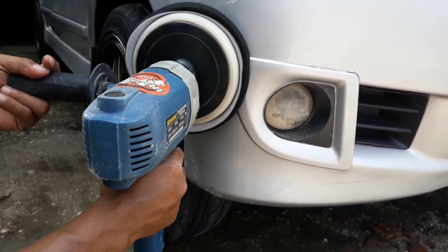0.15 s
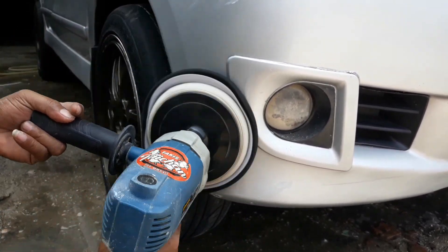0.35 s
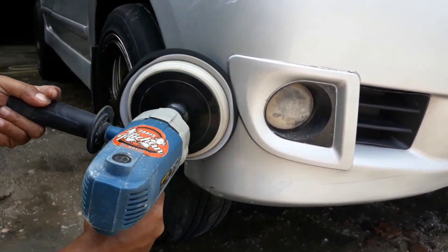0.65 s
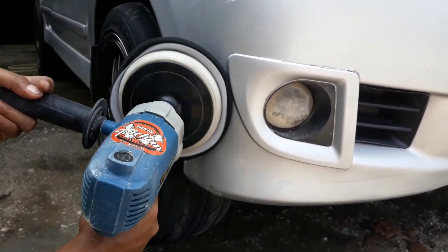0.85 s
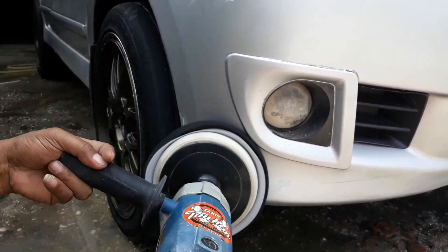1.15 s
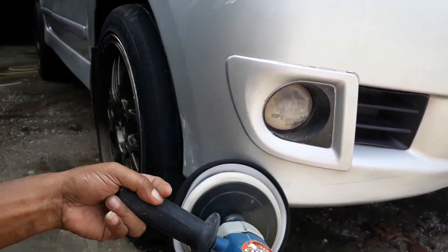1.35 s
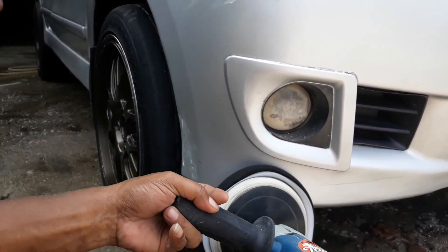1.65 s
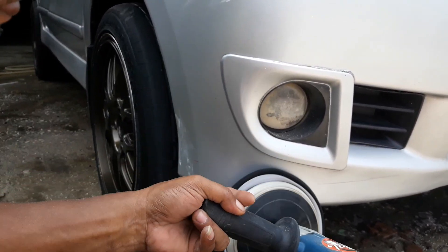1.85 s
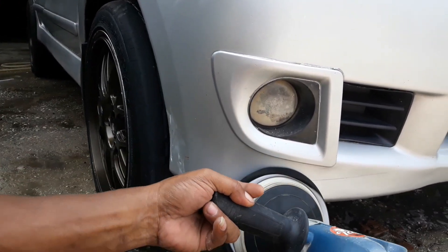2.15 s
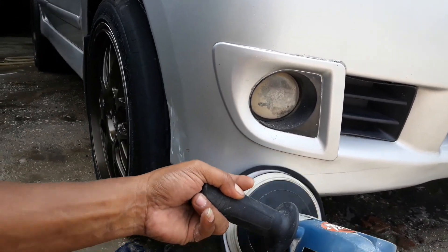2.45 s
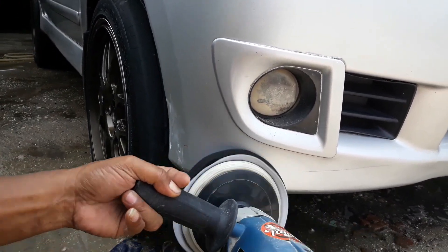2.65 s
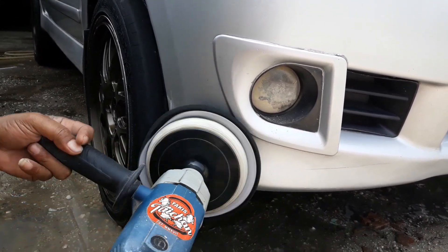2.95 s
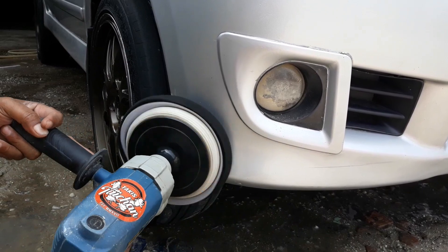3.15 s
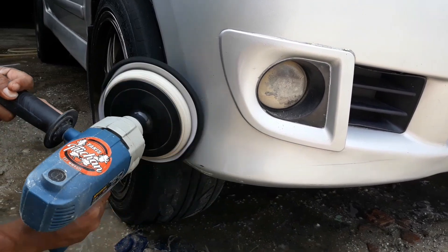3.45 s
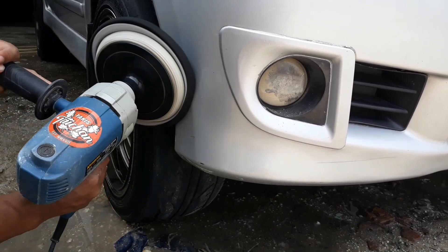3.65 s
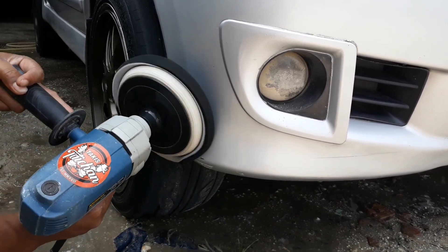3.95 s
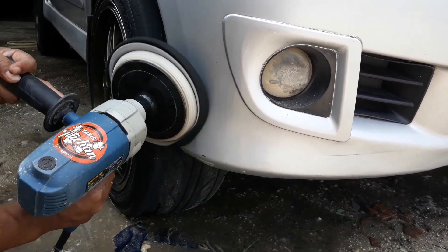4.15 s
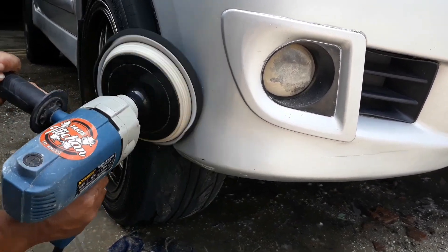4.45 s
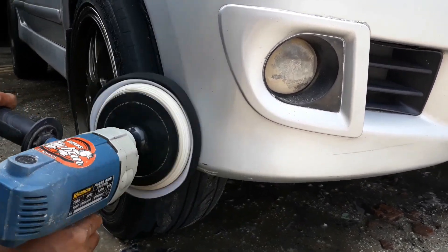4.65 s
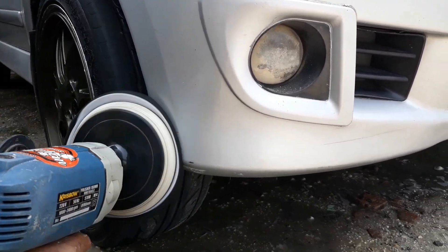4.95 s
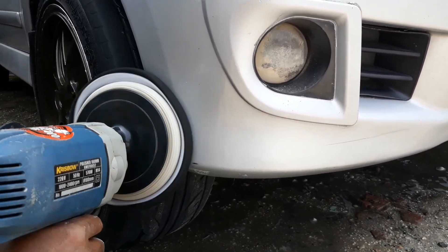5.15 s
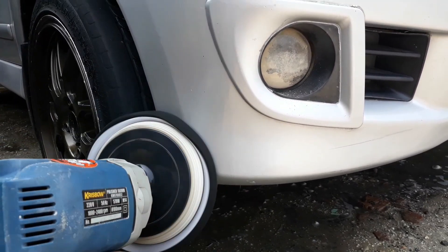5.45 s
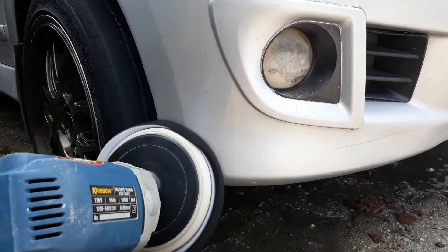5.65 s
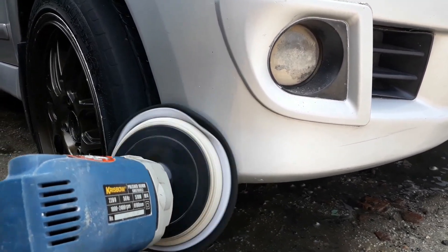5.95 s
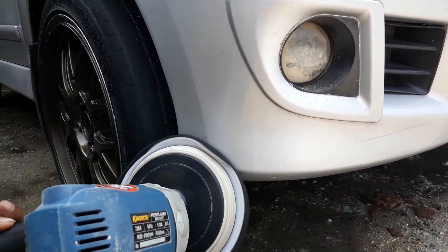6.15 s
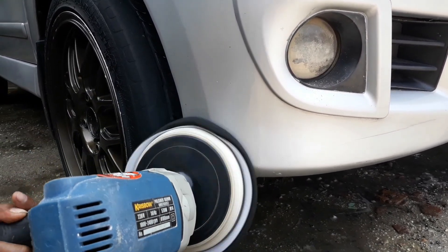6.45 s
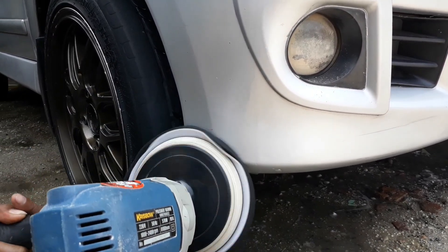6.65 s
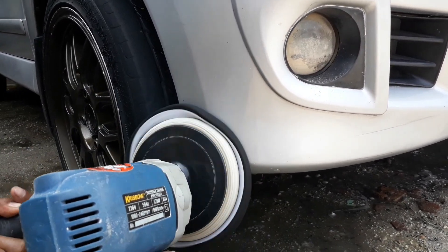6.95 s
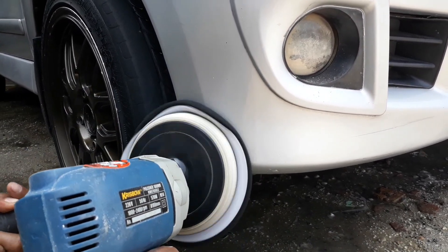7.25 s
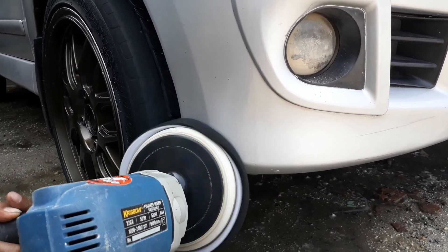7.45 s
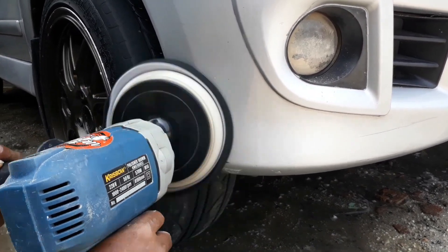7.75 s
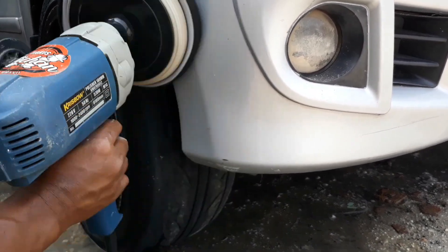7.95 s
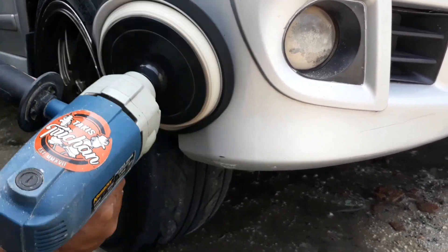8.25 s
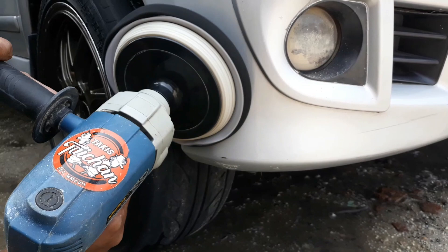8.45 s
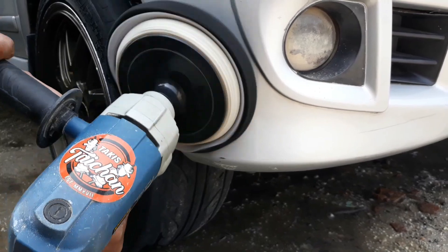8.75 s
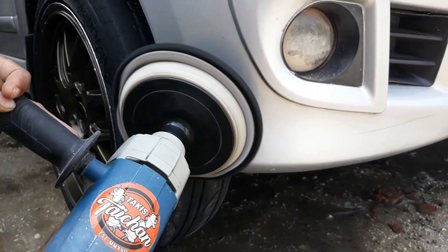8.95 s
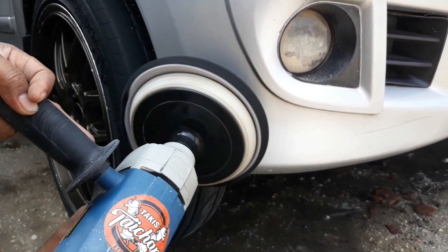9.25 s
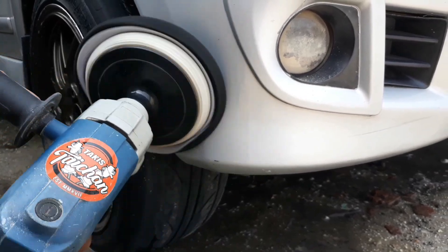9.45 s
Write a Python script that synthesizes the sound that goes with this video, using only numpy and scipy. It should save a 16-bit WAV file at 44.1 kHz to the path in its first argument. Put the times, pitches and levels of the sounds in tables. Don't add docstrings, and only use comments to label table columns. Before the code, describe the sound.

Close, continuous motor whine and gritty gear rattle from a rotary polisher buffing a bumper outdoors, pitch sagging and rising with changing pressure.

```python
import sys
import numpy as np
from scipy import signal
from scipy.fft import rfft, irfft, next_fast_len
from scipy.io import wavfile
from scipy.ndimage import uniform_filter1d

SR = 44100
rng = np.random.default_rng(int(sys.argv[2]) if len(sys.argv) > 2 else 0)


def decibels_to_gain(level_db):
    exponent = np.asarray(level_db, float) / 20
    return 10 ** exponent


def master_out(mix):
    frames = np.transpose(np.atleast_2d(mix))
    ceiling = np.clip(frames, -1, 1)
    pcm = np.round(ceiling * 32767).astype(np.int16)
    wavfile.write(sys.argv[1], SR, pcm)


N = 422919

PINION, LAY_WHEEL, LAY_PINION, SPINDLE_WHEEL, SLOTS = 11, 45, 19, 41, 12
FLUX_HZ = 99.6
CASING, HEAD, VENTS_SIDE, PRESSURE = range(4)
STEP = 40


def mesh_rate(inertia_s=0.094):
    # time in seconds, mesh rate in Hz.
    load_curve = [(0.0, 2260), (0.2, 2334), (1.27, 2430), (1.46, 2504), (1.87, 2475), (2.64, 2218),
                  (2.91, 2273), (3.17, 2520), (3.73, 2596), (4.29, 2327), (6.49, 2344), (6.61, 2237),
                  (7.68, 2160), (8.21, 2357), (8.5, 2156), (8.91, 2114), (9.38, 2361), (9.59, 2258)]
    # centre in seconds, length in seconds, change in Hz.
    dabs = [(0.699, 0.61, -59), (1.121, 0.37, -46), (2.189, 0.58, -35), (3.18, 0.22, -29),
            (4.173, 0.34, 27), (4.601, 0.41, -44), (5.321, 0.45, 44), (5.72, 0.74, 50), (5.849, 0.35, -58),
            (6.099, 0.26, 52), (6.979, 0.46, 30), (7.27, 0.68, -35), (7.91, 0.33, -39), (9.133, 0.41, -29)]
    rate_hz = in_time(load_curve)[0] + sum(swell(*dab) for dab in dabs)
    return fine(uniform_filter1d(rate_hz, int(inertia_s * SR / STEP)))


def gears(mesh):
    # turns of the shaft, level below in dB, level above in dB.
    lay_sides = [(1, -8, -6), (2, -10, -11.5), (3, -19.5, -7), (4, -14.5, -26.5)]
    # mesh multiple, level one rotor turn below in dB, level above in dB.
    pinion_sides = [(1, -17, -30), (2, -10, -16), (3, -10, -17)]
    runout_shares = [0.28, 0.65, 0.67]
    # multiple, level re -36 dB rms in dB.
    second_orders = [(1, -16), (2, -5.5), (3, -0.5)]
    # start in seconds, end in seconds, multiple of mesh rate, level in dB rms.
    glimpsed = [(3.1, 5.6, 24 / 45, -40), (1.7, 3.0, 38 / 45, -35), (0, 2.0, 5, -44), (4.0, 6.5, 5, -45),
                (6.5, 7.1, 72 / 11, -33), (7.1, 8.0, 72 / 11, -42), (7.0, 7.8, 4, -45), (8.4, 9.3, 4, -43),
                (1.3, 2.1, 24 / 11, -35), (6.5, 7.1, 24 / 11, -35), (8.3, 9.2, 24 / 11, -34),
                (1.2, 2.3, 57 / 45, -30), (5.0, 8.0, 57 / 45, -31), (1.05, 1.3, 21 / 11, -23),
                (2.75, 3.0, 21 / 11, -28)]

    mesh_hz = np.gradient(mesh)[::STEP] * SR
    levels_db = [heard_db("mesh", mesh_hz), heard_db("mesh 2"), heard_db("mesh 3")]
    runout = sum(sidebands(j * mesh / LAY_WHEEL, lo, hi) for j, lo, hi in lay_sides)
    out = 0
    for level_db, share, (k, below_db, above_db) in zip(levels_db, runout_shares, pinion_sides):
        pinion = sidebands(mesh / PINION, below_db, above_db)
        skirt = decibels_to_gain(-12) * fine(drift(190.0) + 1j * drift(150.0))
        out = out + tone(k * mesh, level_db) * ((1 + share * runout) * (1 + pinion) + skirt)

    second = mesh * LAY_PINION / LAY_WHEEL
    wobble = 1 + sidebands(second / SPINDLE_WHEEL, -6, -6)
    out = out + tone(4 * second, heard_db("second 4"))
    out = out + wobble * sum(tone(k * second, -36 + db, 2.5) for k, db in second_orders)
    out = out + sum(tone(k * mesh, db) * during(start, end) for start, end, k, db in glimpsed)
    return out.real


def motor(mesh):
    # multiple of rotor speed, level in dB re -5 dB rms.
    rotor_orders = [(13, -38.5), (14, -60), (15, -54.5), (60, -59), (66, -53)]
    rotor = mesh / PINION
    flux = FLUX_HZ * np.arange(N) / SR
    slot = SLOTS * rotor
    slot_hz = np.gradient(slot)[::STEP] * SR
    out = tone(slot, heard_db("slot", slot_hz))
    out += tone(slot + flux, heard_db("upper", slot_hz + FLUX_HZ))
    out += tone(slot - flux, heard_db("lower", slot_hz - FLUX_HZ))
    out += sum(tone(k * rotor, db - 5, 2.6) for k, db in rotor_orders)
    return out.real


def hiss(mesh, patchy_db=1.54):
    # frequency in Hz, density in dB per Hz.
    colour = [(60, -69.5), (130, -59.5), (560, -66), (950, -58.5), (1400, -63), (2600, -50), (4100, -57),
              (4800, -55.5), (6800, -59.5), (8100, -65), (8900, -73.5), (10300, -77.5), (13700, -56.5),
              (15600, -67)]
    # frequency in Hz, width in
    # Hz, height in dB.
    housing = [(8410, 145, 10), (11140, 120, -7), (1020, 90, 0.5), (12500, 820, 3), (14900, 760, 1.5)]

    lay = mesh / LAY_WHEEL
    beat = 0.21 * np.cos(2 * np.pi * lay) + 0.21 * np.cos(8 * np.pi * lay + 1)
    beat += 0.051 * np.cos(2 * np.pi * FLUX_HZ * np.arange(N) / SR)
    rattle = (1 + beat) * rng.standard_normal(N)
    rattle += 0.58 * every_turn(lay, size=850) + 0.38 * every_turn(mesh / PINION, size=210)

    size = next_fast_len(N)
    hz = np.maximum(np.arange(size // 2 + 1) * SR / size, 1)
    geared = (hz > 1200) & (hz < 11500)
    spectrum = np.where(geared, rfft(rattle, size), rfft(rng.standard_normal(N), size))
    colour_hz, density_db = np.transpose(colour)
    colour_db = np.interp(np.log(hz), np.log(colour_hz), density_db)
    colour_db += sum(db / (1 + (2 * (hz - f) / width) ** 2) for f, width, db in housing)
    spectrum *= decibels_to_gain(colour_db) * np.sqrt(SR / 2) * np.minimum(hz / 60, 1) ** 2

    low, mid, high, top = map(heard_db, ["growl", "rattle", "gear hiss", "air"])
    drum, panel, rub, squeak = map(heard_db, ["drum", "panel", "rub", "squeak"])
    steer_log_hz = np.log([500, 950, 1700, 2600, 3400, 4700, 6500, 8430, 10000, 13500])
    steer_db = np.array([0 * low, drum, panel, low, mid, high, rub, squeak, 0.24 * mid, top])
    centres = np.log(np.sort(np.r_[np.geomspace(100, 16000, 22), 8100, 8430, 8750]))
    out = np.zeros(N)
    for k, centre in enumerate(centres):
        share = np.interp(np.log(hz), centres, np.arange(len(centres)) == k)
        band = irfft((spectrum * share).astype(np.complex64), size)[:N]
        place = np.interp(centre, steer_log_hz, np.arange(len(steer_log_hz)))
        below = min(int(place), len(steer_log_hz) - 2)
        band_db = steer_db[below] + (place - below) * (steer_db[below + 1] - steer_db[below])
        band_db = band_db + patchy_db * drift(1.84) + 0.77 * drift(5.1)
        out += band * fine(decibels_to_gain(band_db))
    return out


def every_turn(turns, size):
    pattern = signal.resample(rng.standard_normal(size), 8 * size)
    return np.interp(turns % 1 * len(pattern), np.arange(len(pattern)), pattern)


def ringing():
    # start in
    # seconds, end in seconds, frequency in Hz, width in Hz, level in dB rms.
    modes = [(5, 7.2, 2960, 69, -25.5), (5, 7.2, 3560, 110, -26.5), (0, 1.22, 134, 110, -37.5),
             (7.9, 8.2, 3100, 100, -23), (1.4, 1.98, 4200, 45, -44), (3, 4.05, 11370, 48.6, -40),
             (12, 9.4, 13000, 51, -49), (1, 3.24, 9100, 210, -42), (8.9, 9.5, 1030, 170, -31),
             (5.95, 7.7, 8470, 39.4, -39), (8.5, 9.45, 8440, 40, -36.5), (-0.5, 2.61, 1500, 110, -33.5),
             (5.5, 5.7, 940, 23.6, -41.5)]
    out, shake = np.zeros(N), rng.standard_normal(N)
    for start, end, hz, width_hz, db in modes:
        r = np.exp(-np.pi * width_hz / SR)
        poles = [1, -2 * r * np.cos(2 * np.pi * hz / SR), r * r]
        rung = signal.lfilter([1, 0, -1], poles, shake)
        out += fine(decibels_to_gain(db + 2.5 * drift(8.0))) * during(start, end) * rung / rung.std()
    return out


def reflections(x, count=4):
    tails = rng.standard_normal((count, 1200)) * np.exp(-np.arange(1200) / SR / .005)
    tails /= np.linalg.norm(tails, axis=1, keepdims=True)
    highs = signal.sosfilt(signal.butter(2, 1500, "high", fs=SR, output="sos"), x)
    echo = sum(fine(drift(1.2)) * signal.oaconvolve(highs, tail)[:N] for tail in tails)
    return x + decibels_to_gain(-12) * echo / np.sqrt(count)


def hums():
    # start in seconds, end in seconds, frequency in Hz, level in dB rms.
    engines = [(0, 2.6, 96, -47), (1.5, 2.9, 177.6, -40), (1.3, 2.8, 145.3, -46), (3.7, 5, 91.5, -44),
               (6, 6.9, 119, -44), (7.8, 9.9, 118.4, -40), (6.7, 7.8, 498, -46), (4.2, 4.9, 538, -48),
               (7.8, 8.4, 355, -47)]
    s = np.arange(N) / SR
    return sum(tone(hz * s, db, 1.3).real * during(start, end) for start, end, hz, db in engines)


def heard_db(voice, hz=None):
    # time in seconds, motor casing facing in dB, gear head facing in dB,
    # vents facing in dB, pad pressure in dB.
    stance = [(0.0, 4.5, 0, 7, 4.2), (0.51, -3.5, 5, 0.5, -2.5), (1.37, -3, 5.5, -0.7, -0.7),
              (1.94, 4, -3, -6.5, 0.5), (2.3, -9, -13, -5.5, 0), (2.9, 1.8, 0.5, -1, -1),
              (3.14, 3.2, -0.5, -1.5, 3), (3.71, 6.5, 4, -0.3, 2), (4.28, 5, -10, -1.3, -0.5),
              (4.87, 5, -6.5, 4.5, 0), (5.85, 1.5, 6.5, 2.5, -0.5), (6.0, 3, 2, 4.5, -1.5),
              (6.52, 2.2, 3.5, 0.5, 1.5), (7.48, -5, 1.5, -0.7, -1.8), (7.92, 6, 3.5, 2.5, -3),
              (8.35, 0.5, -10.5, -1.7, 3.5), (9.19, 1.6, 9, -0.5, 1), (9.59, 1, 6, 0.5, 4.5)]
    voices = {"mesh": (-22.5, CASING, 1.14), "slot": (-21, CASING, 0.79), "upper": (-24.5, CASING, 1.5),
              "lower": (-26, CASING, 0.33), "mesh 2": (-25, HEAD, 0.59), "mesh 3": (-33.5, HEAD, 0.11),
              "second 4": (-43.5, HEAD, 0.96), "drum": (0.64, PRESSURE, .99),
              "panel": (-0.39, PRESSURE, -0.11), "growl": (-1.75, CASING, 0.38),
              "rattle": (2.23, VENTS_SIDE, 0.62), "gear hiss": (-1.04, HEAD, 0.22),
              "rub": (0.33, PRESSURE, 0.019), "squeak": (-0.84, PRESSURE, 0.098),
              "air": (-1.3, VENTS_SIDE, 1.14)}
    glints = {"mesh": [(.76, 1.8, 12.5), (1.02, .45, 6), (6.03, .44, -5), (7.95, 0.85, -8)],
              "slot": [(1.56, 1, 4), (2.7, .88, 8.5), (3.8, 2, -1.5), (6.01, 2.3, -4.5), (8.59, 1.75, 7.5)],
              "upper": [(4.25, 0.97, -18), (5.02, 1.16, -9.7)], "lower": [(.51, 1.4, 5), (2.95, 0.64, -9.9),
              (8.19, 0.61, 6)], "mesh 2": [(1.47, 0.5, 4.5), (2.72, .9, 5.5), (3.8, 0.73, -6),
              (6.3, 0.85, 3), (7.35, 1.05, 2.5), (8.12, 0.53, 2)], "mesh 3": [(1.07, .73, -16.5),
              (2.1, 2.6, 6), (3.07, 0.55, -11), (4.2, 0.97, -13), (8.99, .63, 8)],
              "second 4": [(7.46, 1.5, 13)], "rattle": [(1.85, 1.1, 8)], "gear hiss": [(.23, 1.02, -5),
              (3.07, .69, 3.5), (7.49, 2.06, -3)]}
    casing_hz, casing_width_hz, casing_steep = 2615, 181, 0.84
    mean_db, part, share = voices[voice]
    db = mean_db + share * in_time(stance)[part]
    db = db + sum(swell(*glint) for glint in glints.get(voice, []))
    if hz is not None:
        db = db - casing_steep * 10 * np.log10(1 + (2 * (hz - casing_hz) / casing_width_hz) ** 2)
    return db


def tone(turns, level_db, flicker_db=1.5):
    level = np.sqrt(2) * fine(decibels_to_gain(level_db + flicker_db * drift(6.4))).astype(np.float32)
    return level * spin(turns + rng.random())


def sidebands(turns, below_db, above_db, wander_rad=0.96):
    def side(db):
        return fine(decibels_to_gain(db + 2.6 * drift(3.3)) * np.exp(1j * wander_rad * drift(4.0)))

    below, above = side(below_db), side(above_db)
    turning = spin(turns)
    return (below * turning.conj() + above * turning).astype(np.complex64)


def spin(turns):
    angle = (2 * np.pi * (turns % 1)).astype(np.float32)
    return np.cos(angle) + 1j * np.sin(angle)


def during(start, end):
    s = np.arange(N) / SR
    return np.clip(np.minimum(s - start, end - s) / .15 + .5, 0, 1)


def swell(at_s, length_s, height):
    s = np.arange(0, N, STEP) / SR
    return height * np.cos(np.pi * np.clip((s - at_s) / length_s, -.5, .5)) ** 2


def in_time(rows):
    s, *columns = np.transpose(rows)
    return [np.interp(np.arange(0, N, STEP) / SR, s, c) for c in columns]


def drift(rate_hz):
    r = np.exp(-2 * np.pi * STEP * rate_hz / SR)
    slow = signal.lfilter([1], [1, -2 * r, r * r], rng.standard_normal(N // STEP + 2001))[2000:]
    return slow / slow.std()


def fine(control):
    return np.interp(np.arange(N) / STEP, np.arange(len(control)), control)


def scene():
    mesh = np.cumsum(mesh_rate()) / SR + 500 * rng.random()
    return (gears(mesh) + motor(mesh) + reflections(hiss(mesh)) + ringing() + hums())[None]


def roll_off(x):
    return signal.sosfilt(signal.butter(12, 15940, fs=SR, output="sos"), x)


def record(dry):
    over = np.maximum(np.abs(dry) - .55, 0)
    held = dry - np.sign(dry) * (over - .25 * np.tanh(over / .25))
    top_cut = signal.ellip(12, .5, 60, 15720, fs=SR, output="sos")
    return roll_off(signal.sosfilt(top_cut, held))


dry = scene()
out = record(dry)
master_out(out)
```